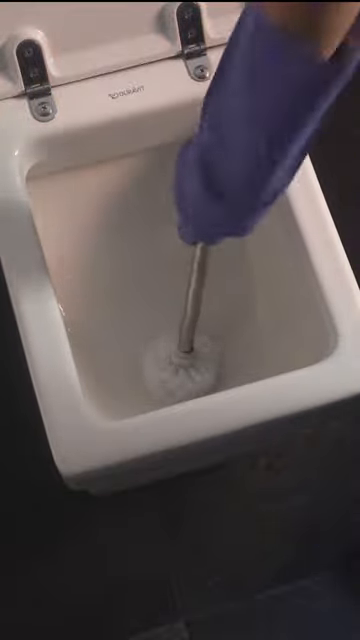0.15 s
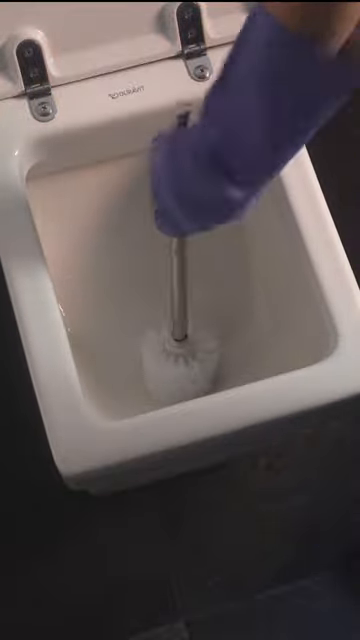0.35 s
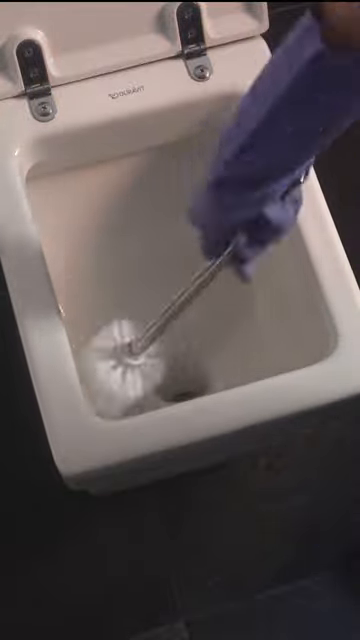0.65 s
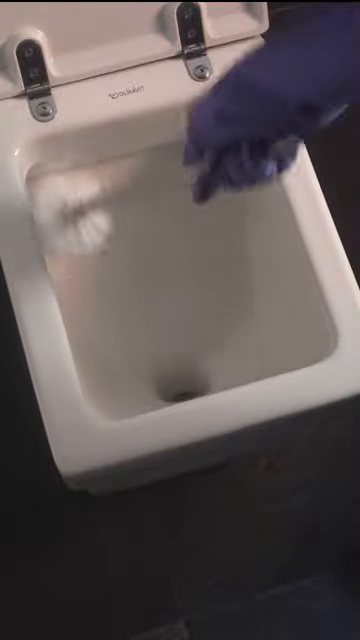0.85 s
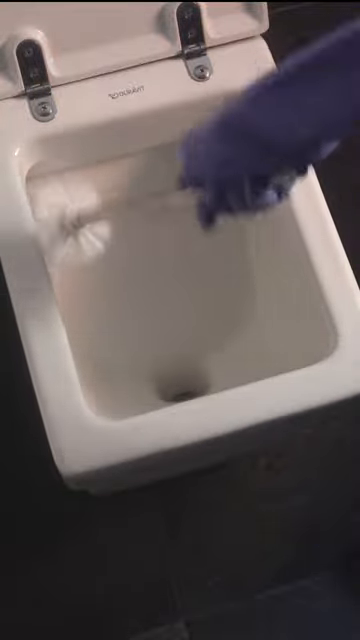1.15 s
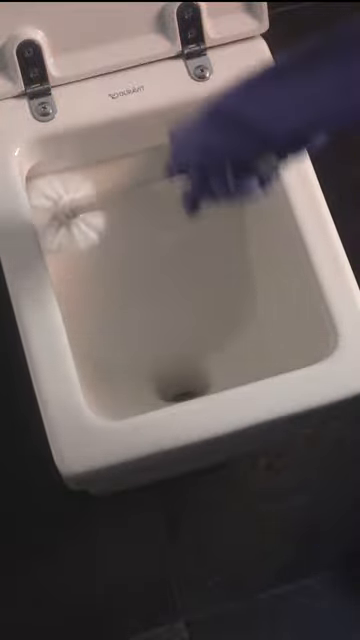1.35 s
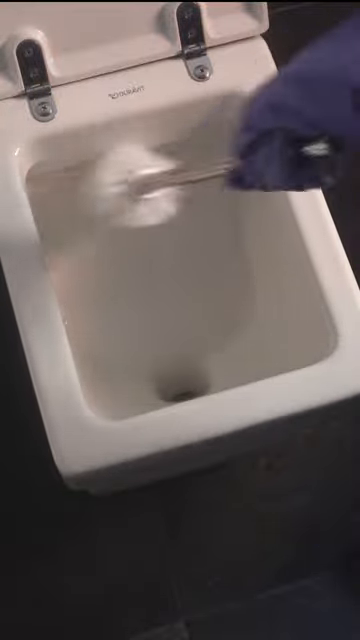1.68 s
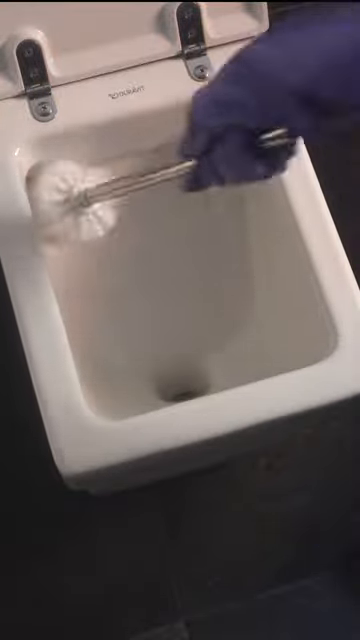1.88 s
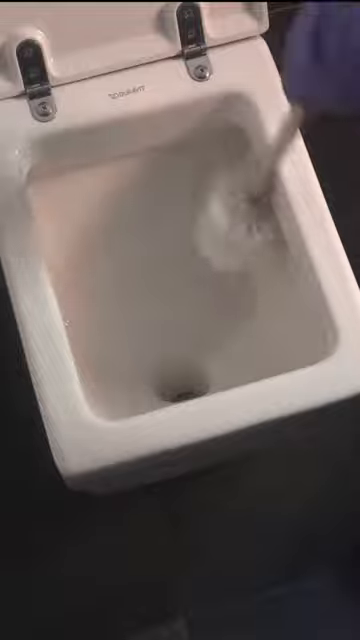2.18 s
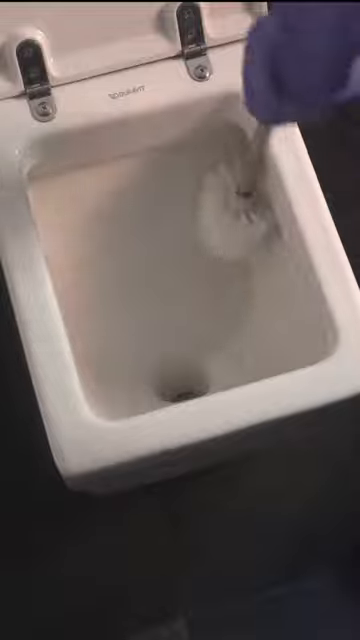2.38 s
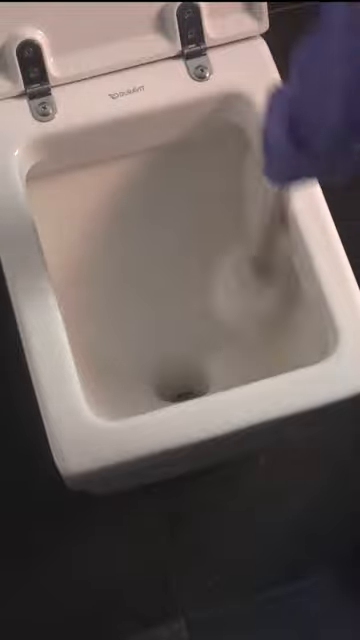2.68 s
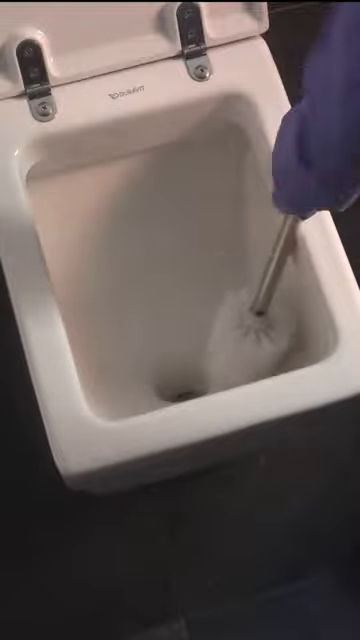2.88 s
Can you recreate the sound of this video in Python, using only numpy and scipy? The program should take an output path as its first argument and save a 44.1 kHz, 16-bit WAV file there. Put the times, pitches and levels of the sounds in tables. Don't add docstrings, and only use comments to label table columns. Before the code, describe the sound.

A toilet brush scrubs a ceramic bowl with crisp bristly swishes, softer at first, then plastic clacks and ringing knocks come harder and faster. Close stereo microphone in a small tiled bathroom with short echo.

```python
import sys
import numpy as np
from scipy import signal
from scipy.io import wavfile

SR = 44100
rng = np.random.default_rng(int(sys.argv[2]) if len(sys.argv) > 2 else 0)


def magnitude_from_level(level_db):
    exponent = np.asarray(level_db, float) / 20
    return 10 ** exponent


def wav_record(signal):
    frames = np.transpose(np.atleast_2d(signal))
    bounded = np.clip(frames, -1, 1)
    quanta = np.round(bounded * 32767).astype(np.int16)
    wavfile.write(sys.argv[1], SR, quanta)


N = 133623


def rms_one(x):
    return x / np.sqrt(np.mean(x ** 2) + 1e-20)


def slow(rate_hz):
    pole = np.exp(-80 * np.pi * rate_hz / SR)
    noise = rng.standard_normal(N // 40 + 2002)
    drift = signal.lfilter([1], [1, -2 * pole, pole * pole], noise)[2000:]
    return np.interp(np.arange(N) / 40, np.arange(len(drift)), rms_one(drift))


def at_hz(points, hz):
    points_hz, points_db = np.transpose(points)
    return np.interp(np.log(hz), np.log(points_hz), points_db)


def butter(order, hz, kind, x):
    return signal.sosfilt(signal.butter(order, hz, kind, fs=SR, output="sos"), x)


def lowpass_in_phase(order, hz, x):
    return signal.sosfiltfilt(signal.butter(order, hz, fs=SR, output="sos"), x)


def colour(drives, spectrum, patchy_db, rate_hz):
    out = 0
    edges_hz = 40 * 2 ** np.arange(0, 9, 1 / 3)
    shared = slow(2 * rate_hz)
    for k, (low, high) in enumerate(zip(edges_hz, edges_hz[1:])):
        if spectrum[0][0] / 2 < low < spectrum[-1][0] * 1.5:
            band = butter(2, [low, high], "band", drives[k % 2])
            flicker_db = patchy_db * (slow(rate_hz) + .5 * shared)
            out = out + band * magnitude_from_level(at_hz(spectrum, np.sqrt(low * high)) + flicker_db)
    return rms_one(out)


def ring(drive, hz, t60_s):
    r = magnitude_from_level(-60 / (t60_s * SR))
    w = 2 * np.pi * hz / SR
    return signal.lfilter([0, np.sin(w)], [1, -2 * r * np.cos(w), r * r], drive + 1e-18)


def damping(t, free_s, damp_s):
    return np.exp(-np.maximum(t - free_s, 0) / damp_s)


def clicks(start_s, level_db):
    out = np.zeros(N)
    out[np.minimum((np.asarray(start_s) * SR).astype(int), N - 1)] = magnitude_from_level(level_db)
    return out


def room_air():
    # hz, level_db
    spectrum = [(18, -50), (40, -30), (80, -12), (170, -29), (355, -1), (620, -1), (1100, -41), (1600, -8),
                (1950, -15), (3300, -120)]
    return magnitude_from_level(-64) * colour(rng.standard_normal((2, N)), spectrum, patchy_db=2.0, rate_hz=4.7)


def scrub_levels():
    # time_s, hollow_db, ceramic_drive_db, sheen_db, core_grind_db
    level_points = [(0, 7.5, 11, 6, -12), (.3, 8.5, 0, 7.5, -16), (.58, 11, -30, 8, -15), (.63, 0, 1, 4, 10),
                    (1.001, -10, -11, 5, -12), (1.2, -4, -14, 2.1, 0.5), (1.6, -1, 10, 6.5, 4.5),
                    (2.002, -3, -42.5, 4, -16), (2.012, 1, 18, -4, 9.5), (2.13, 2, 9.5, -3.5, -7),
                    (2.2, 3, 8.5, -8, 1), (2.37, 2, -3, -0.5, -5.5), (2.45, -19, 11.5, -2, 7),
                    (2.75, -10, 3, -11.5, -6.5), (2.9, -3, -4, 2.5, 9.5), (2.97, 3.5, -11, 4, -4)]
    time_s, *controls = np.transpose(level_points)
    return [np.interp(np.arange(N) / SR, time_s, c) for c in controls]


def effort():
    # peak_s, rise_s, fall_s, level_db
    strokes = [(0.01, 0.075, 0.064, -33.5), (0.178, 0.078, 0.042, -32), (0.28, 0.038, 0.05, -33),
               (0.456, 0.08, 0.14, -32), (0.609, 0.0051, 0.12, -32), (0.731, 0.074, 0.065, -36),
               (.78, 0.037, 0.028, -34.5), (0.82, 0.016, 0.2, -29.5), (1.012, 0.016, 0.088, -29),
               (1.12, 0.0091, 0.026, -34.5), (1.171, 0.039, 0.048, -34), (1.207, 0.02, 0.27, -29.5),
               (1.32, 0.0035, 0.0061, -24.5), (1.42, 0.017, 0.16, -36), (1.528, 0.0068, 0.015, -29),
               (1.61, 0.014, 0.72, -40.5), (1.761, 0.0089, 0.38, -35.5), (2.007, 0.0012, 0.1, -32),
               (2.151, 0.01, 0.11, -23.5), (2.296, 0.064, 0.07, -28), (2.409, 0.017, 0.091, -21.5),
               (2.512, 0.015, 0.043, -27), (2.572, 0.0017, 0.16, -19.5), (2.711, 0.0027, 0.055, -19.5),
               (2.79, 0.026, 0.0094, -23.5), (2.835, 0.021, 0.061, -27), (2.899, 0.032, 0.049, -32),
               (2.95, 0.026, 0.011, -35), (3.0, 0.016, 0.04, -31)]
    shape, rest_db = 1.04, -52
    t = np.arange(N) / SR
    power = magnitude_from_level(2 * rest_db)
    for peak_s, rise_s, fall_s, level_db in strokes:
        away = np.abs((t - peak_s) / np.where(t < peak_s, rise_s, fall_s))
        power = power + magnitude_from_level(2 * level_db) * np.exp(-2 * away ** shape)
    return np.sqrt(power)


def flicks():
    per_s, spread_db, share = 2500, 1.7, 0.3
    sizes = magnitude_from_level(spread_db * np.minimum(rng.exponential(1, N), 6))
    born = rng.random(N) < per_s / SR
    swarm = rms_one(signal.lfilter([.2], [1, -.8], sizes * born))
    grain = np.sqrt(1 - share + share * swarm ** 2)
    return grain * rng.standard_normal((2, N))


def tufts(tips):
    swing_db, t60_s = 5, .012
    out = 0
    for hz in np.geomspace(4700, 10500, 14):
        out = out + magnitude_from_level(swing_db * slow(3.1)) * ring(tips, hz, t60_s)
    return rms_one(out)


def hollow(tips):
    # hz, level_db, width_hz
    resonances = [(392, -16.5, 61), (514, -21, 84), (675, -39, 30), (2114, -5, 95), (2602, 1.5, 190),
                  (3263, 3, 360), (3606, 1, 165)]
    flicker_db = 1.5
    out = 0
    for k, (hz, level_db, width_hz) in enumerate(resonances):
        t60_s = 1.5 / width_hz
        tone = rms_one(ring(ring(tips[k % 2], hz, t60_s), hz, t60_s))
        out = out + magnitude_from_level(level_db + flicker_db * slow(17)) * tone
    return rms_one(out)


def brush(force, hollow_db, sheen_db, grind_db):
    # hz, level_db_per_hz
    bristles = [(300, -56), (550, -56), (1100, -46), (2200, -19.5), (4200, -5.5), (6300, 3), (9500, 0),
                (15800, -3)]
    core_top_hz, sheen_hz, tuft_db, trap_db = 1900, 7340, -11, -17
    tips = flicks()
    hiss = colour(tips, bristles, patchy_db=2.28, rate_hz=15.0)
    core = lowpass_in_phase(3, core_top_hz, hiss)
    hiss = hiss - core + magnitude_from_level(grind_db) * core + magnitude_from_level(tuft_db) * tufts(tips[0])
    body = lowpass_in_phase(2, sheen_hz, hiss)
    sheen = magnitude_from_level(sheen_db) * (hiss - body)
    return force * (body + sheen + magnitude_from_level(hollow_db + trap_db) * hollow(tips))


def cracks():
    # start_s, peak_db, pitch_hz
    knocks = [(0.277, -8.5, 7100), (0.6058, -13.5, 7100), (0.78, -9, 6200), (0.816, -11, 9000),
              (0.9051, -8.5, 6000), (1.0078, -15, 6200), (1.2024, -8, 9000), (1.2059, -3.5, 5500),
              (1.3163, -11, 8550), (1.5245, -16, 6500), (1.5966, -26, 7000), (1.863, -16.5, 5960),
              (2.0065, -5.5, 7260), (2.145, -20, 6500), (2.328, -5, 5350), (2.4003, -10, 7900),
              (2.4077, 2.5, 6750), (2.5098, -6.5, 5000), (2.5657, -10, 6800), (2.587, -9, 10000),
              (2.5924, -1, 5500), (2.6689, -10, 7000), (2.7084, -10, 6500), (2.728, -2, 11000),
              (2.7338, -4.5, 5000), (2.7885, -6.5, 7100), (2.8251, -6.5, 10200), (2.8978, -7, 5000),
              (2.948, -12.5, 5950), (2.9956, -8.5, 11000), (3.0284, -7, 5970)]
    snap_s, tail_s, tail_db = .0008, .009, -7
    octaves, click_db, crack_db = 1.5, 7, -7
    out = np.zeros(N + SR)
    t = np.arange(SR // 10) / SR
    shape = t / snap_s * np.exp(1 - t / snap_s) + magnitude_from_level(tail_db) * np.exp(-t / tail_s)
    click = magnitude_from_level(click_db) * (np.arange(len(t)) == SR // 1000)
    for start_s, peak_db, pitch_hz in knocks:
        edges_hz = pitch_hz * 2 ** (np.array([-.5, .5]) * octaves)
        snap = butter(1, edges_hz, "band", shape * rng.standard_normal(len(t)) + click)
        snap = butter(2, 3000, "high", snap)
        start = int(start_s * SR)
        out[start:start + len(t)] += magnitude_from_level(peak_db + crack_db) * snap / np.abs(snap).max()
    return out[:N]


def bowl(rub):
    # hz, level_db, t60_s
    low_modes = [(404, -4, 0.035), (508, -5.5, 0.23), (554, -9.5, 0.17), (630, -9, 0.059)]
    mid_modes = [(1522, -3, 0.065), (1549, -10.5, 0.3), (1641, -3, 0.1), (1230, -14, 0.015)]
    high_modes = [(2900, -4, 0.084), (3066, 7.5, 0.25), (4640, -34, 0.072), (5000, -8, 0.042),
                  (5800, 2, 0.049)]
    # low_hz, high_hz
    spans_hz = [(320, 750), (850, 1900), (2600, 7000)]
    # start_s, low_modes_db, mid_modes_db, high_modes_db, free_s
    strikes = [(0.607, -47.5, -46, -68, 0.12), (0.809, -45, -72, -45, 0.038), (1.203, -39, -40, -68, 0.087),
               (1.314, -42.5, -43.5, -70, 0.068), (1.387, -50, -53, -45, 0.15),
               (1.486, -84, -90.5, -41.5, 0.047), (1.525, -41, -58, -51, 0.14),
               (1.807, -45.5, -54, -51, 0.1), (2.006, -34.5, -25.5, -33, 0.081),
               (2.202, -47, -30, -25.5, 0.035), (2.298, -48, -34.5, -38, 0.088),
               (2.378, -50, -38, -39, 0.067), (2.428, -50, -33.5, -32, 0.11), (2.567, -45, -57, -30, 0.16),
               (2.667, -41.5, -60, -58, 0.034), (2.708, -36.5, -60, -31, 0.13),
               (2.835, -39.5, -47.5, -42, 0.07)]
    rattle_s, rub_db = (.04, .022, .018), (-49.5, -51, -56.5)
    rubbed_t60_share, ring_db, scatter_db, damp_s = .4, -2, 1.5, 0.014
    total = 0
    t = np.arange(SR // 4) / SR
    for k, modes in enumerate((low_modes, mid_modes, high_modes)):
        out = np.zeros(N + SR)
        rattle = np.exp(-t / rattle_s[k])
        for hz, mode_db, t60_s in modes:
            hum = ring(rub * rng.standard_normal(N), hz, rubbed_t60_share * t60_s)
            out[:N] += magnitude_from_level(mode_db + rub_db[k]) * hum
            for start_s, *levels_db, free_s in strikes:
                tone = ring(rattle * rng.standard_normal(len(t)), hz, t60_s)
                tone = tone * damping(t, free_s, damp_s)
                peak_db = levels_db[k] + mode_db + ring_db + scatter_db * rng.standard_normal()
                start = int(start_s * SR)
                out[start:start + len(t)] += magnitude_from_level(peak_db) * tone / np.abs(tone).max()
        total = total + butter(2, spans_hz[k], "band", out[:N])
    return total


def booms():
    # start_s, peak_db, free_s
    shudders = [(0.609, -53.5, 0.087), (0.809, -60, 0.17), (1.1, -56, 0.047), (1.202, -56.5, 0.063),
                (1.321, -58, 0.094), (1.524, -53, 0.098), (1.805, -55.5, 0.05), (2.004, -46, 0.095),
                (2.201, -50, 0.14), (2.385, -40, 0.26), (2.5, -45, 0.061), (2.568, -36.5, 0.046),
                (2.64, -40.5, 0.047), (2.71, -37, 0.078), (2.84, -44, 0.055)]
    mode_hz, t60_s, shudder_s, damp_s = 259.1, .3, 0.042, 0.013
    out = np.zeros(N + SR)
    t = np.arange(SR // 4) / SR
    for start_s, peak_db, free_s in shudders:
        push = np.sin(2 * np.pi * mode_hz * t) + 1.6 * rng.standard_normal(len(t))
        tone = ring(np.exp(-t / shudder_s) * push, mode_hz, t60_s) * damping(t, free_s, damp_s)
        start = int(start_s * SR)
        out[start:start + len(t)] += magnitude_from_level(peak_db) * tone / np.abs(tone).max()
    return out[:N]


def thumps(grind):
    # start_s, peak_db
    pushes = [(0.613, -59), (0.67, -54), (0.797, -51), (0.902, -72), (1.202, -65), (1.252, -59),
              (1.332, -51), (1.527, -41), (1.826, -58), (2.036, -66), (2.21, -61), (2.41, -33), (2.61, -45),
              (2.741, -52), (2.862, -46), (2.959, -36)]
    # hz, level_db, t60_s
    fixture = [(80, -9.5, 0.077), (67, -39, 0.085), (151, -21.5, 0.032)]
    rock_db = -45
    push = clicks(*np.transpose(pushes)) + magnitude_from_level(rock_db) * grind * rng.standard_normal(N)
    out = 0
    for hz, level_db, t60_s in fixture:
        swell = ring(ring(push, hz, t60_s), hz, t60_s)
        to_unit_peak = 2 * np.e * np.log(1000) / (t60_s * SR)
        out = out + magnitude_from_level(level_db + 2) * swell * to_unit_peak
    return out


def bathroom(x):
    t60_s, wall_cut_hz = 0.28, 14000
    out = np.zeros(N)
    dull = np.exp(-2 * np.pi * wall_cut_hz / SR)
    lags = (rng.uniform(.012, .035, size=10) * SR).astype(int)
    for k, lag in enumerate(lags):
        loop, state = x.copy(), [0.]
        gain = magnitude_from_level(-60 * lag / SR / t60_s)
        for i in range(lag, N, lag):
            back, state = signal.lfilter([gain * (1 - dull)], [1, -dull], loop[i - lag:i], zi=state)
            loop[i:i + lag] += back[:N - i]
        out += (loop - x) * (-1) ** k
    return out


def side_signal(wet):
    # hz, side_db
    width = [(100, -20), (500, -12), (1500, -3), (4000, -7.5), (8500, -18), (11500, -4.5), (15000, 3.5)]
    width_db, spread_s = -14, 0.039
    smear = rng.standard_normal(4000) * np.exp(-np.arange(4000) / (spread_s * SR))
    smeared = signal.fftconvolve(wet, smear)[:N]
    patches = colour([smeared, smeared], width, patchy_db=3.5, rate_hz=20.5)
    return magnitude_from_level(width_db) * wet.std() * patches


def scene():
    room_db, ceramic_room_db, air_side_db = -16, -4, -4
    hollow_db, drive_db, sheen_db, grind_db = scrub_levels()
    force = effort()
    direct = brush(force, hollow_db, sheen_db, grind_db) + cracks()
    ceramic = bowl(force * magnitude_from_level(drive_db)) + booms() + thumps(force * magnitude_from_level(grind_db))
    echoes = bathroom(direct + magnitude_from_level(ceramic_room_db) * ceramic)
    wet = direct + ceramic + magnitude_from_level(room_db) * echoes
    middle = wet + room_air()
    side = side_signal(wet) + magnitude_from_level(air_side_db) * butter(2, 200, "high", room_air())
    return np.array([middle + side, middle - side])


def top_cut(x):
    return signal.sosfilt(signal.butter(12, 16590, fs=SR, output="sos"), x)


def record(dry):
    bottom_hz, top_hz = 62.5, 16350
    mix = butter(3, bottom_hz, "high", dry)
    mix = signal.sosfilt(signal.cheby2(14, 60, top_hz, fs=SR, output="sos"), mix)
    return top_cut(mix)


dry = scene()
out = record(dry)
wav_record(out)
```